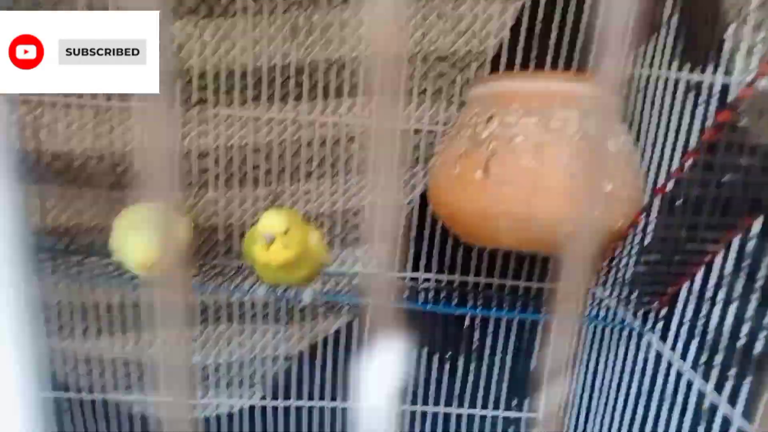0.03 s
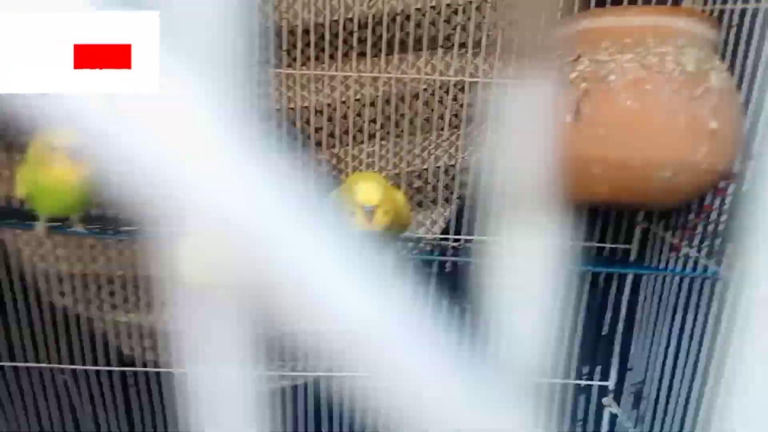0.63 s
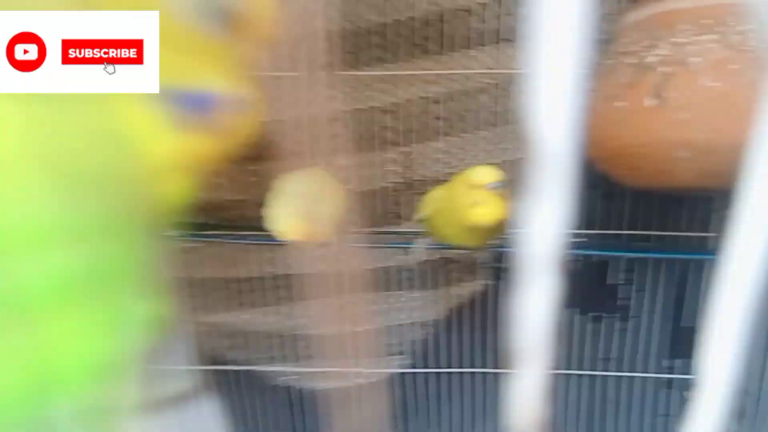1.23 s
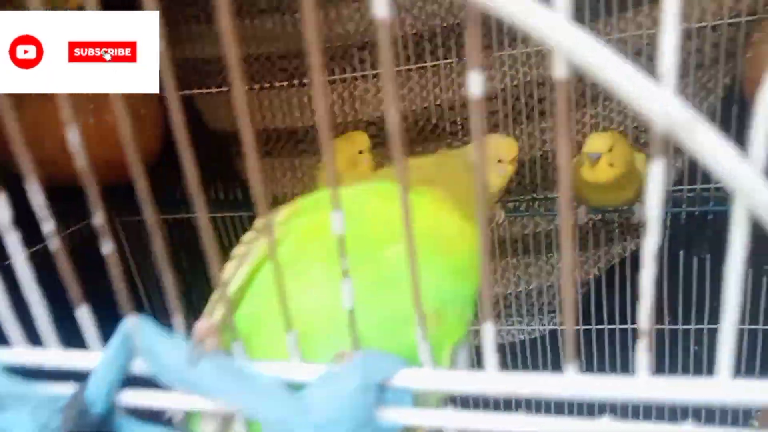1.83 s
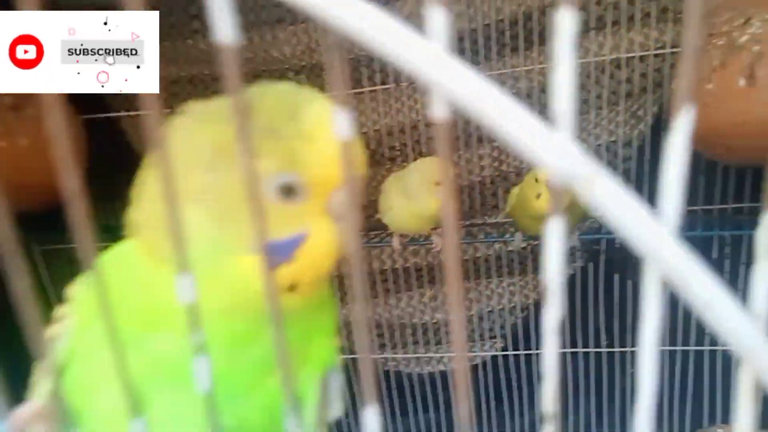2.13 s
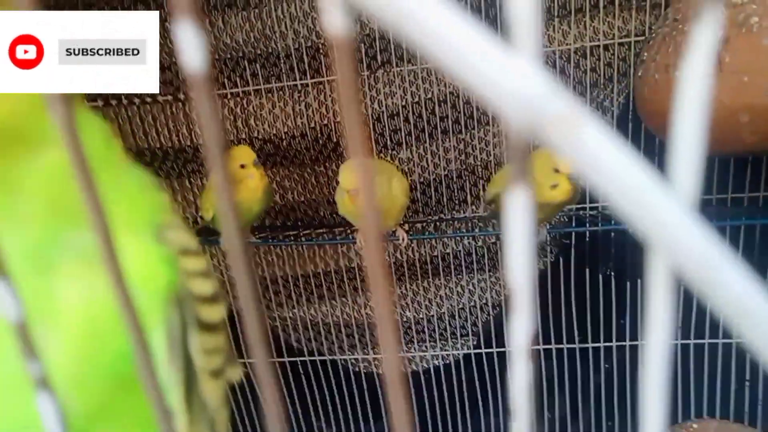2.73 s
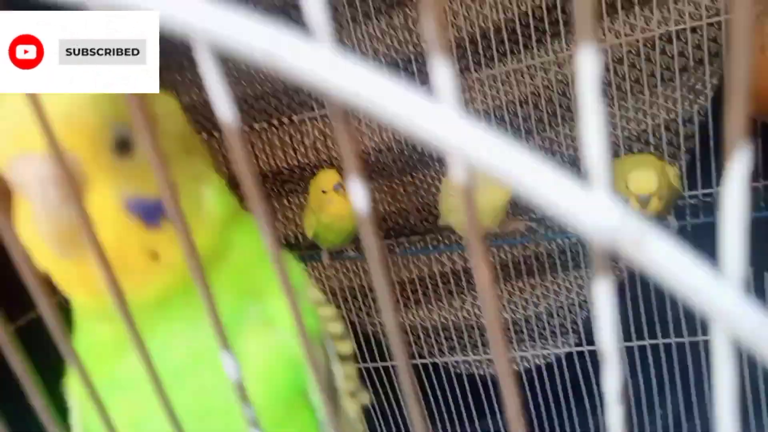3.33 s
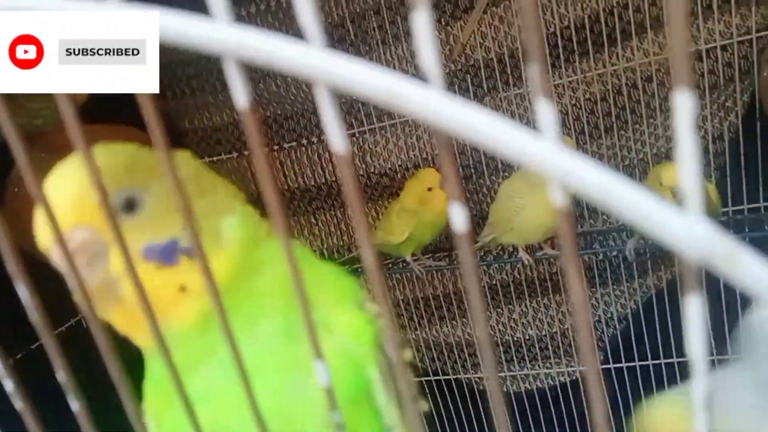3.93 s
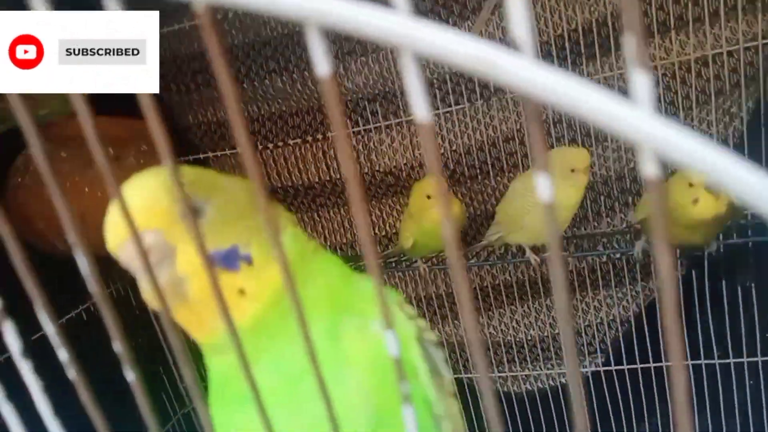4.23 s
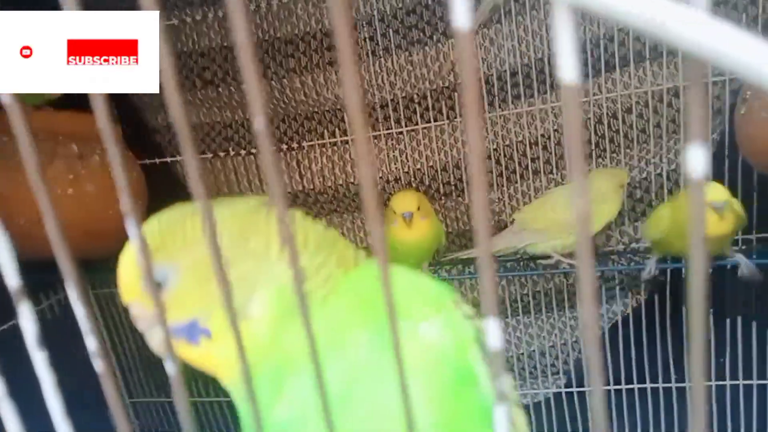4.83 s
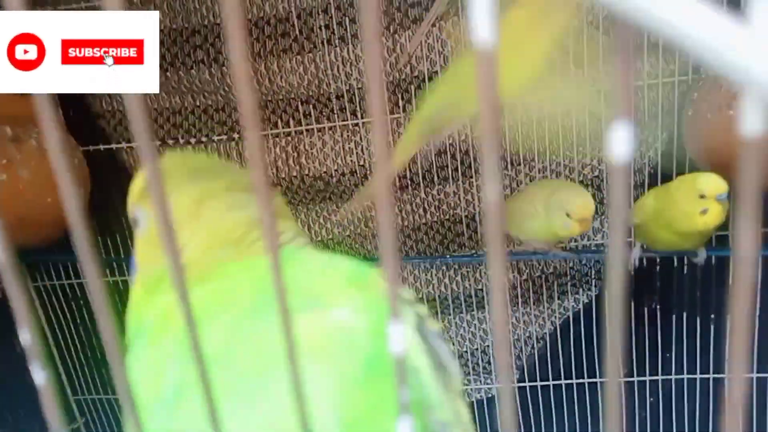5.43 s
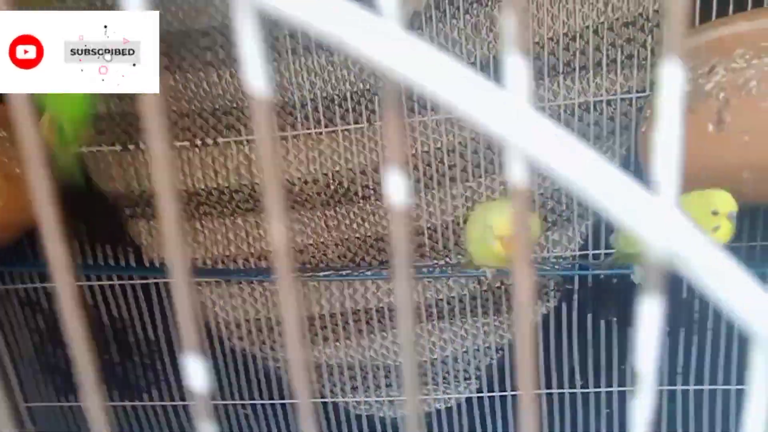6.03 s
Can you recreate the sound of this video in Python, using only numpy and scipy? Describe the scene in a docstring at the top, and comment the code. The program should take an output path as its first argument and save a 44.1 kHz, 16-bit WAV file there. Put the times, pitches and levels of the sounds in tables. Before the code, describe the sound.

Close by in a small room, budgerigars give three short, high, warbled chirps, the last one quieter. Just after the second, the wire cage is softly bumped several times and one wire rings faintly. Later, claws and beaks tick on the bars with light rustling and a few more soft knocks. A steady low motor hum and a soft rush of air continue throughout.

```python
"""Budgerigars give three short warbled chirps, close by in a wire cage in a small room.
Each chirp is a string of quick pitch slides made by the bird's voice organ, the syrinx.
A hand bumps the cage, claws and beaks tick on the bars, something rustles along them,
and one wire is plucked and rings. A mains-powered motor hums throughout over a soft rush of air."""
import sys
import numpy as np
from scipy import signal
from scipy.fft import rfft, irfft, next_fast_len
from scipy.io import wavfile
from scipy.ndimage import uniform_filter1d, map_coordinates

SR = 44100
rng = np.random.default_rng(int(sys.argv[2]) if len(sys.argv) > 2 else 0)


def int16_out(signal):
    """Quantize to a 16-bit WAV file."""
    q = np.round(np.clip(np.atleast_2d(signal).T, -1, 1) * 32767)
    wavfile.write(sys.argv[1], SR, q.astype(np.int16))


N = 267819
T = np.arange(N) / SR
TREBLE_LIMIT_HZ = 15830

# spells of rubbing along the cage: start_s, length_s, dull_db, bright_db
RUSTLE_SPELLS = [(.09, .12, -82, -85.5), (1.12, 0.13, -74, -84.5), (1.215, 0.2, -63, -81),
                 (1.593, 0.51, -62, -83), (2.6, 0.18, -79, -88.5), (3.661, 0.15, -79, -81.5),
                 (4.03, 0.26, -66.5, -80), (4.21, 0.53, -63, -82), (4.722, 0.5, -71.5, -80.5),
                 (5.513, 0.22, -63.5, -74.5), (5.7, .12, -60.5, -72), (5.785, 0.27, -63.5, -81),
                 (6.025, 0.21, -56.5, -63)]
# the dull part of a touch on the cage: frequency_hz, gain_db
DULL_SPECTRUM = [(130, 7), (250, 6), (500, 7.5), (900, -1), (1500, 1.5), (2300, -11.5), (3800, -14.5),
                 (5200, -33.5), (16000, -42)]
# the bright, scratchy part of a touch: frequency_hz, gain_db
BRIGHT_SPECTRUM = [(1500, -22.5), (3600, 0), (5200, -12), (7300, 7.5), (9000, -8), (12500, -7.5),
                   (15000, -1.5), (16000, 1.5)]


def amp(db):
    """Turns decibels into a number to multiply a sound by."""
    return 10 ** (np.asarray(db) / 20)


def unit(x):
    """Scales a signal so that its average strength (rms) is 1."""
    return x / np.sqrt(np.mean(x ** 2) + 1e-20)


def read(points, hz):
    """Looks up a value at hz, joining the points with straight lines on a scale of octaves."""
    frequencies, values = np.transpose(points)
    return np.interp(np.log(hz + 1), np.log(frequencies + 1), values)


def add(mix, start_s, sound):
    """Mixes a sound in at the given time."""
    part = mix[max(round(start_s * SR), 0):][:len(sound)]
    part += sound[:len(part)]


def colour(x, spectrum):
    """Turns each frequency up or down, following rows of frequency_hz, gain_db."""
    size = next_fast_len(N + 4096)
    gain = amp(read(spectrum, np.fft.rfftfreq(size, 1 / SR)))
    return irfft(rfft(x, size) * gain, size)[:N]


def noise(spectrum):
    """Noise of strength 1 with the given balance of low and high frequencies."""
    return unit(colour(rng.standard_normal(N), spectrum))


def drift(rate_hz):
    """A smooth random wobble of strength 1 that changes at about the given rate."""
    knots, coarse_s = rng.standard_normal(N // 8), T[::16]
    curve = map_coordinates(knots, [coarse_s * 2 * rate_hz], order=2, mode="wrap")
    return unit(np.interp(T, coarse_s, curve))


def room(x, tail_db=-15, reflections_per_s=3000):
    """Adds quick echoes from near surfaces and a short blurred tail; cloth soaks up their treble."""
    # how long the tail takes to fade by 60 dB: frequency_hz, fade_s
    fade_times = [(300, 0.8), (1800, 0.1), (2700, 0.25), (4000, 0.22), (8000, 0.24), (16000, 0.13)]
    # echoes from the cage floor, a pot and near walls: delay_s, level_db
    near_echoes = [(.0017, -14), (.0031, -15.5), (.0052, -8.5), (.0074, -17), (.0093, -17.5),
                   (.0142, -21.5), (.021, -26), (.029, -30)]
    # tone of all the reflected sound: frequency_hz, gain_db
    echo_spectrum = [(200, -6), (1800, 1), (2400, -6), (3100, -3.5), (3800, -9), (5000, -6), (16000, -12)]
    t = np.arange(SR // 2) / SR
    signs = rng.choice([-1., 1.], len(t))
    reflections = signs * (rng.random(len(t)) < reflections_per_s / SR) * (t > .008)
    hz, frame_s, bands = signal.stft(reflections, SR, nperseg=256)
    fade = amp(-60 * frame_s / read(fade_times, hz)[:, None])
    tail = signal.istft(bands * fade, SR, nperseg=256)[1][:len(t)]
    echo = amp(tail_db) * tail / np.linalg.norm(tail)
    for delay_s, level_db in near_echoes:
        echo[round(delay_s * SR)] += amp(level_db)
    return x + colour(signal.fftconvolve(x, echo)[:N], echo_spectrum)


def air(rush_db=-64, rumble_db=-69, swell_db=1.0):
    """Moving air makes a gently swelling rush over the low rumble of the room."""
    # tone of the rush: frequency_hz, gain_db
    rush_spectrum = [(130, 4), (230, -2), (450, -3.5), (570, -9), (750, 1.5), (1000, -6), (1300, -12),
                     (1900, -7), (2600, -15.5), (3600, -25), (5200, -38), (7300, -29), (9500, -42),
                     (15500, -46.5)]
    # tone of the rumble: frequency_hz, gain_db
    rumble_spectrum = [(15, -13), (50, -11.5), (90, -5), (140, 13), (220, -14), (600, -58.5)]
    rush = amp(rush_db + swell_db * drift(3.3)) * noise(rush_spectrum)
    return rush + amp(rumble_db) * noise(rumble_spectrum)


def motor(hum_hz=100.17, waver_db=0.35, overtone_waver=0.28, whine_waver=0.076):
    """Mains power makes a motor hum: one firm low note with weak, wavering tones around it."""
    # the hum and its overtones: multiple_of_hum_hz, level_db
    hum_tones = [(1, -37.5), (2, -76.5), (3, -69.5), (5, -74.5), (6, -77.5), (7, -78), (8, -87), (9, -84),
                 (10, -84), (11, -83.5)]
    # other weak tones of the running motor: pitch_hz, level_db
    whine_tones = [(75, -68), (275, -78.5), (375, -80), (638, -81.5), (735, -81), (772, -87.5), (837, -84),
                   (1039, -78.5)]
    phase = 2 * np.pi * hum_hz * T + 0.035 * drift(3)
    out = amp(hum_tones[0][1] + waver_db * drift(5.5)) * np.sin(phase)
    for multiple, level_db in hum_tones[1:]:
        gain = amp(level_db) * (1 + overtone_waver * drift(1.8))
        out += gain * np.sin(multiple * phase + 2 * np.pi * rng.random())
    for pitch_hz, level_db in whine_tones:
        gain = amp(level_db) * (1 + whine_waver * drift(2.4))
        out += gain * np.sin(2 * np.pi * pitch_hz * T + drift(1.5))
    return np.sqrt(2) * out  # makes each level the tone's average strength, not its peak


def rustle(bright_grain_db=5, dull_grain_db=3.5, clump_db=3.5, fidget_db=-90, fidget_swell_db=3):
    """Friction comes in grainy clumps: a dull rub, and a fine scratch that never quite stops."""
    dull_gain = np.zeros(N)
    bright_gain = amp(fidget_db + fidget_swell_db * drift(5.1))
    for start_s, length_s, dull_db, bright_db in RUSTLE_SPELLS:
        stroke = signal.windows.tukey(int(length_s * SR), .7)
        add(dull_gain, start_s, amp(dull_db) * stroke)
        add(bright_gain, start_s, amp(bright_db) * stroke)
    clumps = clump_db * drift(35).clip(-1.5, 1.5)
    rub = unit(amp(clumps + dull_grain_db * drift(150).clip(-2, 2)) * noise(DULL_SPECTRUM))
    scratch = unit(amp(clumps + bright_grain_db * drift(630)) * noise(BRIGHT_SPECTRUM))
    return dull_gain * rub + bright_gain * scratch


def patter(ticks_per_s=12, pitch_range_hz=(674, 1670), scatter_db=3):
    """Lists light ticks that fall at random in each spell of rustling and follow its strength."""
    rows = []
    for start_s, length_s, dull_db, bright_db in RUSTLE_SPELLS:
        for slot, (when, pitch, force) in enumerate(rng.random(size=(30, 3))):
            delay_s = (slot + when) / ticks_per_s
            force_db = scatter_db * (2 * force - 1)
            pitch_hz = np.interp(pitch, (0, 1), pitch_range_hz)
            if delay_s < length_s:
                rows.append((start_s + delay_s, dull_db - 2 + force_db, pitch_hz,
                             bright_db + 4 + force_db))
    return rows


def ticks(rise_s=0.00062, fade_s=0.033, knock_db=-1, edge_boost_db=3, sharpness=9.9):
    """Claws and beaks hit perch and bars: a woody knock, a dull body and an edge that dies faster."""
    # the clearest ticks: start_s, level_db, pitch_hz, edge_db
    clear_ticks = [(1.253, -51.5, 912, -72), (1.6538, -48.5, 1560, -48.5), (1.706, -51.5, 1650, -64),
                   (1.9524, -54.5, 926, -69), (3.977, -61.5, 902, -62.5), (4.2328, -45, 1540, -58),
                   (4.271, -58, 1800, -57), (4.285, -52, 1680, -56.5), (4.334, -49, 990, -72),
                   (4.3828, -57, 1080, -72), (4.4418, -47.5, 1480, -70), (4.4933, -50.5, 1460, -71.5),
                   (4.5476, -49, 1070, -69), (4.5817, -53.5, 1800, -56.5), (5.8483, -53.5, 1600, -72),
                   (6.0493, -55.5, 1730, -74)]
    out, t = np.zeros(N), np.arange(SR // 8) / SR
    white, dull, bright = rng.standard_normal(N), noise(DULL_SPECTRUM), noise(BRIGHT_SPECTRUM)
    attack = 1 - np.exp(-t / rise_s)
    for start_s, level_db, pitch_hz, edge_db in list(clear_ticks) + patter():
        piece = (round(start_s * SR) + np.arange(len(t))) % N
        knock = unit(signal.lfilter(*signal.iirpeak(pitch_hz, sharpness, SR), white[piece]))
        wood = amp(level_db - 60 * t / fade_s) * (amp(knock_db) * knock + dull[piece])
        edge = amp(edge_boost_db + edge_db - 75 * t / fade_s) * bright[piece]
        add(out, start_s, attack * (wood + edge))
    return out


def bumps(length_s=0.02715, sag=0.063):
    """A hand bumps the cage softly; each bump swells and dies quickly while its pitch sinks."""
    # hollow knocks and dull thuds: middle_s, level_db, pitch_hz
    hand_bumps = [(1.312, -53.5, 362), (1.670, -47, 490), (1.728, -40.5, 483), (1.847, -47.5, 477),
                  (1.852, -38.5, 104), (1.907, -46, 121), (1.955, -47, 486), (1.96, -40, 101),
                  (2.003, -54.5, 473), (4.115, -54, 329), (4.24, -52, 265), (4.281, -51.5, 281),
                  (5.626, -45.5, 473), (5.779, -52, 460)]
    out, position = np.zeros(N), np.linspace(-1, 1, int(length_s * SR))
    swell = np.cos(np.pi * position / 2) ** 2
    for middle_s, level_db, pitch_hz in hand_bumps:
        phase = 2 * np.pi * np.cumsum(pitch_hz * (1 - sag * position)) / SR
        add(out, middle_s - length_s / 2, amp(level_db) * swell * np.sin(phase))
    return out


def wire(start_s=1.66, ring_db=-77, rattle_db=1.5):
    """A plucked cage wire rings at several pitches, choked as it rattles against its neighbours."""
    # the ways the wire bends and rings: pitch_hz, gain_db, fade_s (time to fall 60 dB)
    wire_tones = [(3760, -15, .25), (4500, 3, 0.26), (5370, -8, 0.22), (6500, -1, 0.18), (7020, 11.5, 0.29),
                  (10900, -6, .2)]
    out, t = np.zeros(N), np.arange(SR // 2) / SR
    for pitch_hz, gain_db, fade_s in wire_tones:
        choke_db = rattle_db * abs(drift(80)[:len(t)])
        gain = amp(ring_db + gain_db - 60 * t / fade_s - choke_db)
        add(out, start_s, gain * np.sin(2 * np.pi * pitch_hz * t))
    return out


def peeps_and_squeak(quiver=0.011):
    """Faint, thin bird peeps, and one very high, brief squeak from a tick on the cage."""
    # one trembling tone each: start_s, length_s, pitch_hz, slide (share of the pitch), level_db
    thin_tones = [(2.52, 0.089, 7360, -0.021, -78.5), (3.67, 0.057, 2640, 0.005, -67.5),
                  (3.969, 0.02, 2654, 0.0087, -63), (4.281, 0.013, 15440, 0, -58),
                  (5.156, 0.098, 10000, -0.071, -84.5)]
    out = np.zeros(N)
    for start_s, length_s, pitch_hz, slide, level_db in thin_tones:
        progress = np.linspace(0, 1, int(length_s * SR))
        hz = pitch_hz * (1 + slide * progress + quiver * drift(420)[:len(progress)])
        swell = np.sin(np.pi * progress).clip(0) ** .5
        add(out, start_s, amp(level_db) * swell * np.sin(2 * np.pi * np.cumsum(hz) / SR))
    return out


def syllables(t, start_s, end_s, attack_s=0.0024, release_s=0.0044):
    """Pitch, loudness and overtone level of one chirp; each syllable curves through three pitches."""
    # the syllables of all the chirps, one pitch slide each:
    # start_s, length_s, first_hz, middle_hz, last_hz, effort_db, swell_db, overtones_db
    slides = [(.494, 0.032, 4080, 3570, 3640, -32.5, 12.5, -7),
              (0.533, 0.018, 2926, 2693, 2507, -30, 2, -5), (0.555, 0.012, 2900, 3525, 2890, -32.5, 6, -13),
              (0.573, .015, 2663, 2220, 1907, -29.5, 8, -8), (0.588, 0.025, 4095, 3105, 2974, -33, -7, -5),
              (0.614, 0.012, 2900, 2280, 1890, -28.5, 4, -5),
              (0.627, 0.024, 3830, 3287, 2950, -35, -11, -2.5),
              (.650, 0.018, 2980, 2520, 2330, -29.5, 1.5, -5.5),
              (1.326, .016, 3940, 3353, 3380, -36, 13, 8),
              (1.344, 0.0047, 3500, 2545, 2200, -45.5, 0, 15.5),
              (1.349, 0.028, 4960, 3873, 3830, -35.5, 1.5, -6.5),
              (1.387, 0.013, 3900, 3736, 4140, -31, -6, -8.5),
              (1.402, 0.024, 4050, 3000, 2745, -39.5, 3, -0.5),
              (1.430, 0.0082, 4600, 3480, 2620, -39, 4, 0), (1.437, 0.036, 2350, 2660, 2940, -37.5, 6, -5),
              (1.472, 0.025, 3236, 3260, 2640, -36.5, -3, -7.5),
              (1.496, 0.024, 2600, 2210, 1300, -44.5, 1, -12),
              (3.158, .017, 4370, 3566, 3550, -44, 10, 5.5),
              (3.177, 0.0056, 3350, 2560, 2390, -45.5, -5, 17), (3.18, .023, 4200, 3436, 3380, -43, 16, 0),
              (3.214, 0.012, 3550, 3555, 3520, -38, 0, 1.5), (3.239, .016, 3050, 2685, 2360, -44.5, 1, -5),
              (3.259, .006, 4250, 3480, 2700, -47, 0, 1), (3.265, 0.038, 2290, 2610, 2760, -43.5, -2, -5.5),
              (3.297, 0.028, 3340, 3120, 2700, -41.5, 6, -3.5),
              (3.323, 0.015, 2650, 1886, 1610, -44, 9, -2)]
    rows = [row for row in slides if start_s <= row[0] < end_s]
    hz = np.full(len(t), float(rows[0][2]))
    gain, overtones_db = np.zeros(len(t)), np.zeros(len(t))
    for onset_s, length_s, first_hz, middle_hz, last_hz, effort_db, swell_db, bright_db in rows:
        progress = np.clip((t - onset_s) / length_s, 0, 1)
        bend_hz = (2 * middle_hz - first_hz - last_hz) * 2 * progress * (1 - progress)
        hz = np.where(t >= onset_s, first_hz + (last_hz - first_hz) * progress + bend_hz, hz)
        overtones_db = np.where(t >= onset_s, bright_db, overtones_db)
        attack = np.clip((t - onset_s) / attack_s, 0, 1)
        release = np.clip(.5 + (onset_s + length_s - t) / release_s, 0, 1)
        gain += attack * release * amp(effort_db + swell_db * (progress - .5))
    return uniform_filter1d(hz, size=60), gain, uniform_filter1d(overtones_db, size=60)


def chirp(start_s, end_s, treble_db, rasp_db, quiver, dips_db=4, flutter_db=3, buzz_hz=235, buzz=0.19):
    """The syrinx sweeps one strong, quivering tone; the throat and beak pick out its overtones."""
    # how well the main tone carries, so slides flash as they cross a peak: pitch_hz, gain_db
    main_spectrum = [(1300, -1.5), (2000, -3), (2300, 1), (2600, -1), (3000, -9), (3300, -3.5),
                     (3600, -0.5), (4000, -3.5), (4700, -7)]
    # how well throat and beak pass the overtones: frequency_hz, gain_db
    throat_spectrum = [(3400, 1.5), (4400, -8), (5400, -21.5), (6400, -11), (7200, -4), (8200, -18.5),
                       (9200, -21.5), (11300, -21.5), (12800, -23), (14800, -1), (16000, -2)]
    # tone of the rasp in the voice: frequency_hz, gain_db
    rasp_spectrum = [(1200, -3), (3000, 3.5), (5300, -0.5), (7300, -10.5), (9500, -5.5), (12500, -19.5),
                     (14800, 7), (16000, -8)]
    beam = [(8000, 0), (11000, treble_db / 2), (15000, treble_db)]  # treble leaves the beak in a beam
    t = np.arange(start_s, end_s, 1 / SR)
    n = len(t)
    pitch, gain, overtones_db = syllables(t, start_s, end_s)
    hoarse = .5 + np.linspace(0, 1, n)  # the voice gets rougher as the chirp goes on
    hz = pitch * (1 + quiver * hoarse * drift(500)[:n])
    effort = gain * amp(5 * np.log2(hz / 3500))  # high notes strain: more overtones and rasp
    phase = 2 * np.pi * np.cumsum(hz) / SR
    dip_db = dips_db * hoarse * drift(300)[:n].clip(0)
    voice = gain * amp(read(main_spectrum, hz) - dip_db) * np.sin(phase)
    for multiple in range(2, 7):
        overtone_hz = multiple * hz
        level_db = overtones_db - 8 * np.log2(multiple) + flutter_db * drift(133.4)[:n]
        level_db += read(throat_spectrum, overtone_hz) + read(beam, overtone_hz)
        voice += effort * amp(level_db) * np.sin(multiple * phase) * (overtone_hz < TREBLE_LIMIT_HZ)
    rasp = colour(noise(rasp_spectrum), beam)[:n]
    voice += effort * rasp * amp(rasp_db + 6 * (hoarse - 4))
    pulsing = 1 + buzz * hoarse ** 2 / 2 * np.sin(2 * np.pi * buzz_hz * t + drift(40)[:n])
    return voice * pulsing


def budgerigars():
    """Three close chirps, each aimed and pressed differently, so their treble and rasp vary."""
    # the chirps: start_s, end_s, treble_db, rasp_db (both relative), quiver (share of the pitch)
    calls = [(0.488, .68, 0.5, -13.5, 0.01), (1.323, 1.53, -17.5, -16, 0.029),
             (3.152, 3.346, -25, -19, 0.015)]
    out = np.zeros(N)
    for start_s, end_s, treble_db, rasp_db, quiver in calls:
        add(out, start_s, chirp(start_s, end_s, treble_db, rasp_db, quiver))
    return out


def scene():
    """Birds and knocks on the cage echo in the room, over the rustle, the hum and the air."""
    near = budgerigars() + peeps_and_squeak() + wire() + bumps() + ticks()
    return (room(near) + rustle() + motor() + air())[None]


def record(dry):
    """Cuts off the very highest treble."""
    low_pass = signal.firwin(1023, TREBLE_LIMIT_HZ, window=("kaiser", 9), fs=SR)
    return signal.oaconvolve(dry, low_pass[None], "same")


dry = scene()
out = record(dry)
int16_out(out)
```